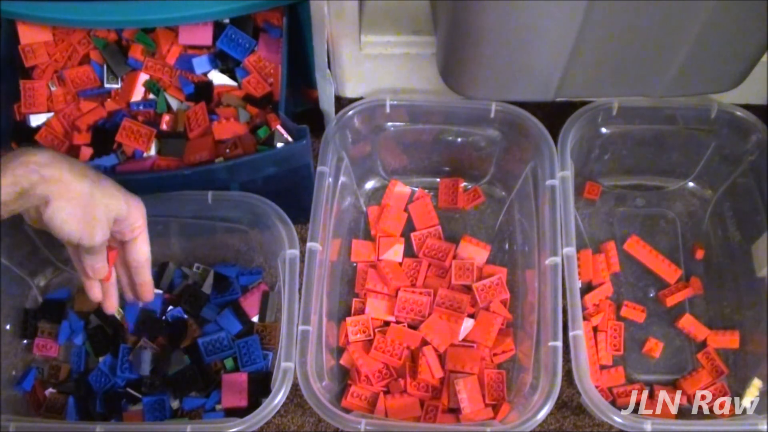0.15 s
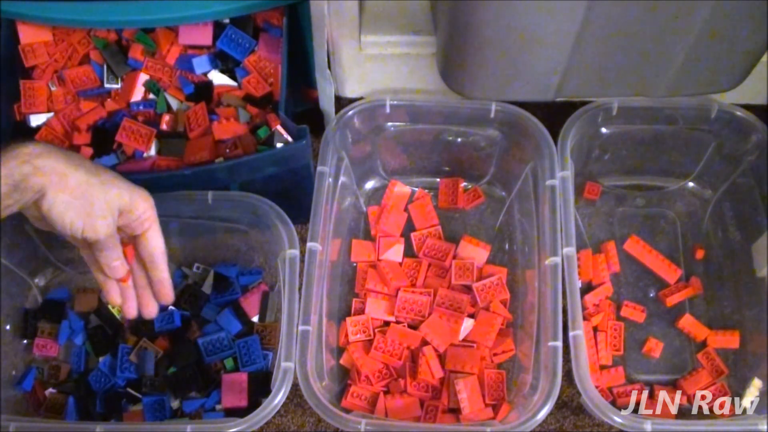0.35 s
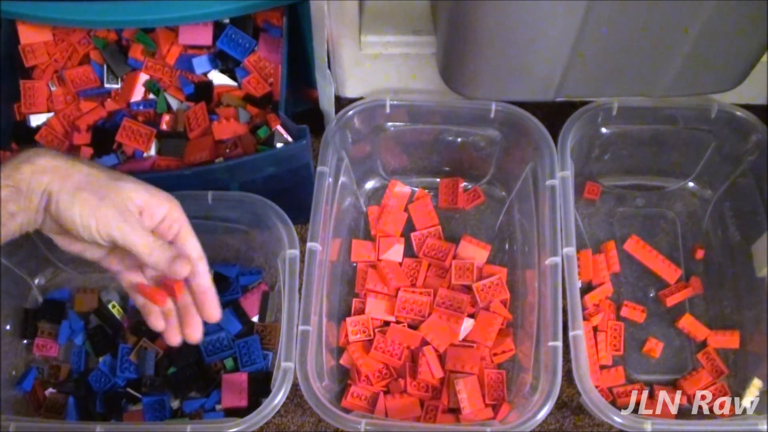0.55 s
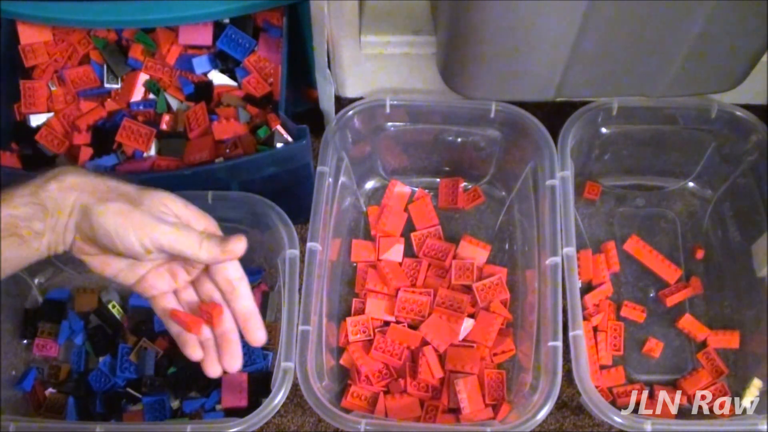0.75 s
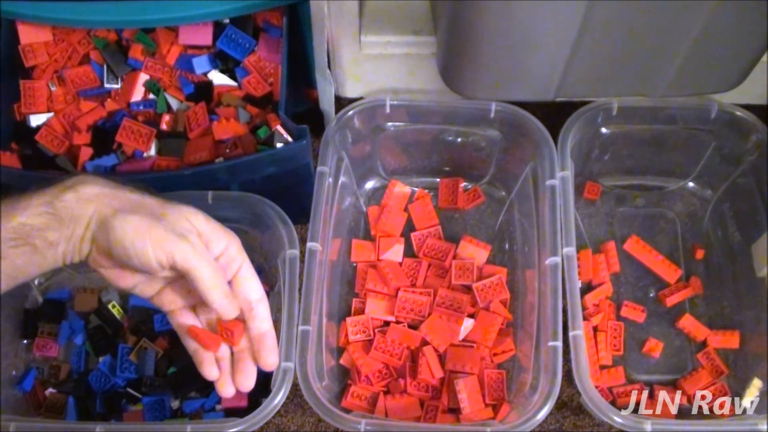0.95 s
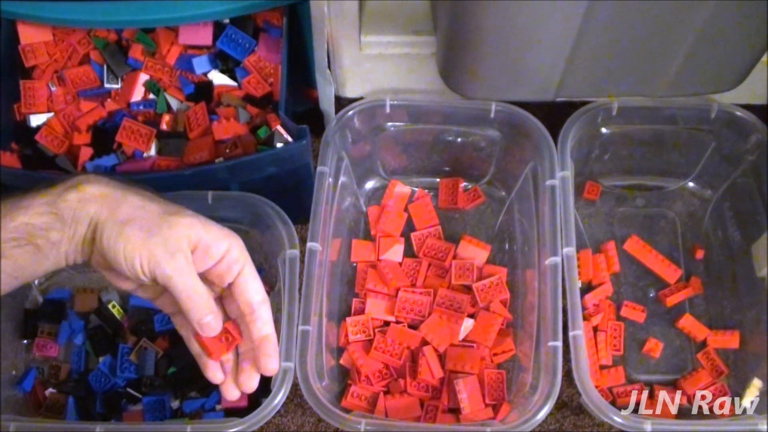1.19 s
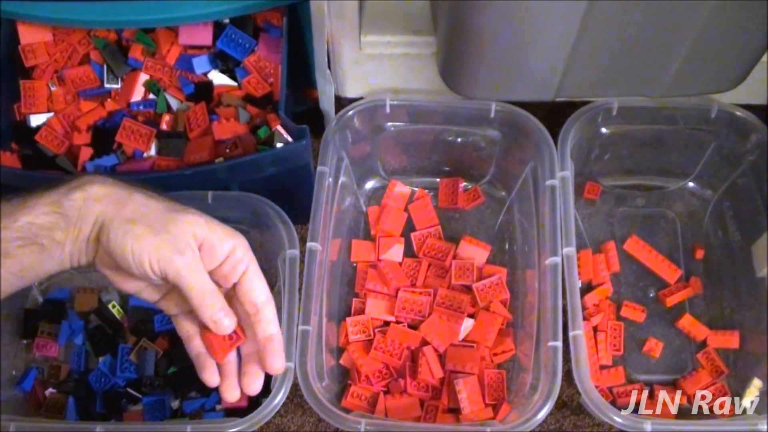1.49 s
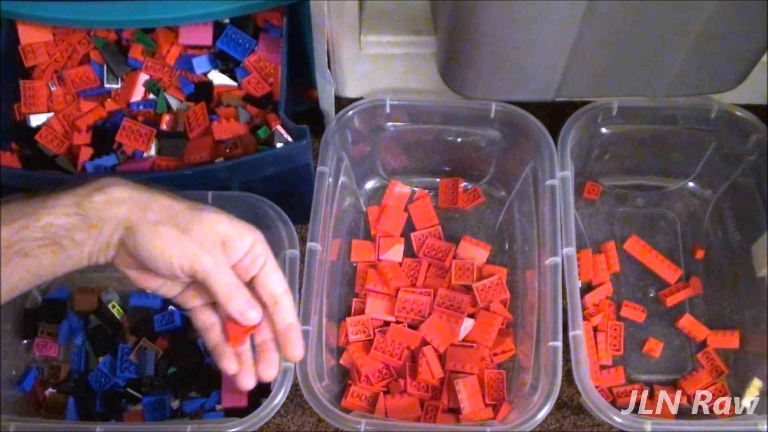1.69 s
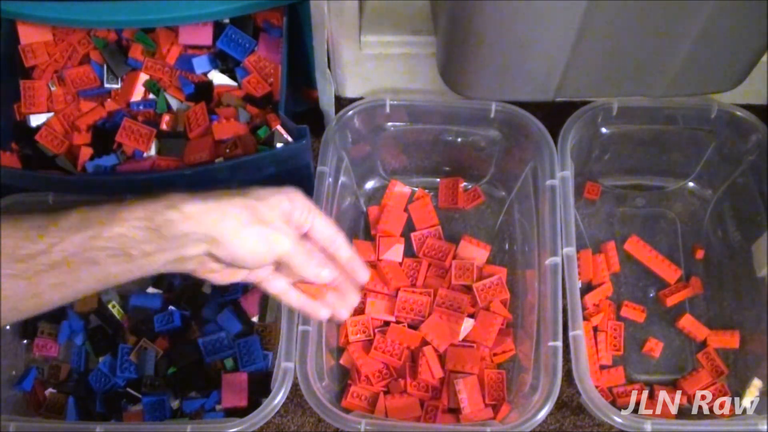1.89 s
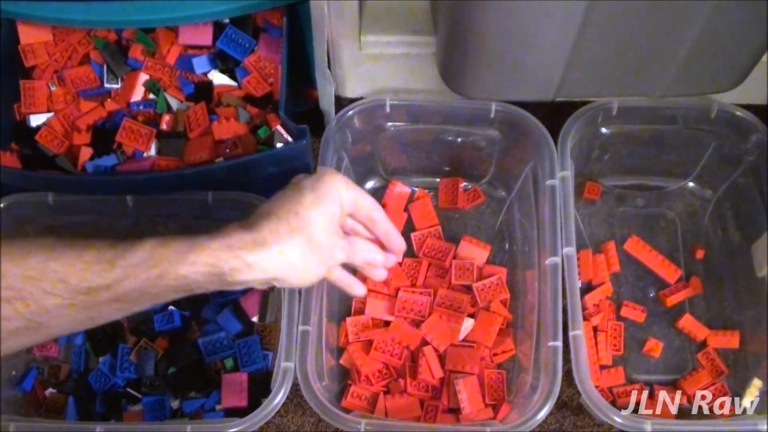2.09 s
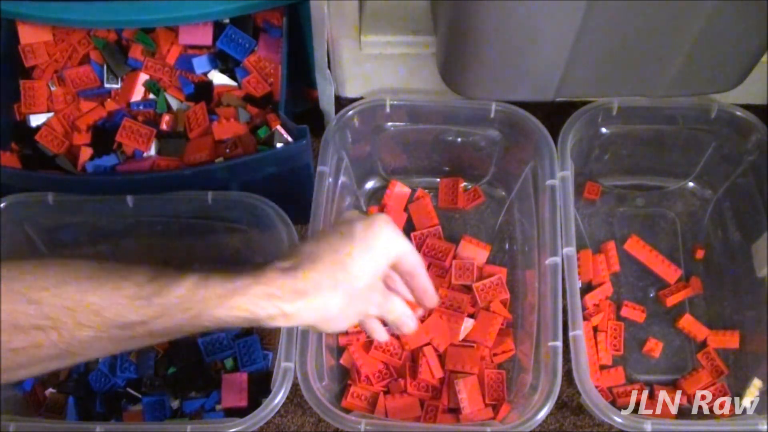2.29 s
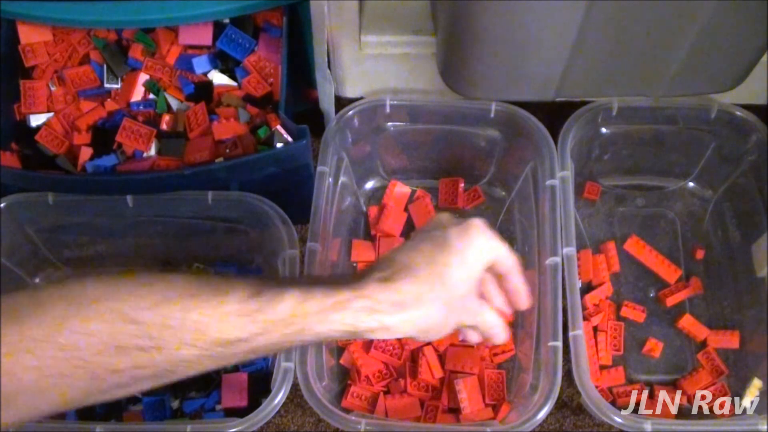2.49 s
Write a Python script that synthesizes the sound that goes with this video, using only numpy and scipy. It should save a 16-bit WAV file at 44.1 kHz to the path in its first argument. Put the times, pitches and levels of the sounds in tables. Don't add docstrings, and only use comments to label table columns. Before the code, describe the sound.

Plastic toy bricks rattle sharply into bins twice, clicking lightly in the hand over faint room hum.

```python
import sys
import numpy as np
from scipy import signal
from scipy.fft import rfft, irfft, next_fast_len
from scipy.io import wavfile
from scipy.ndimage import uniform_filter1d

SR = 44100
rng = np.random.default_rng(int(sys.argv[2]) if len(sys.argv) > 2 else 0)


def ratio_of_db(decibels):
    return 10 ** (np.asarray(decibels, float) / 20)


def int16_out(signal):
    q = np.round(np.clip(np.atleast_2d(signal).T, -1, 1) * 32767)
    wavfile.write(sys.argv[1], SR, q.astype(np.int16))


N = 116865

BRICK_LOW_HZ, BRICK_HIGH_HZ = 235, 16300


def rms_one(x):
    return x / np.sqrt(np.mean(x ** 2) + 1e-20)


def at_hz(points, hz):
    points = np.array(points)
    return np.interp(np.log(np.maximum(hz, 1)), np.log(points[:, 0]), points[:, 1])


def coloured(spectrum):
    weight = ratio_of_db(at_hz(spectrum, np.fft.rfftfreq(N, 1 / SR)))
    return irfft(rfft(rng.standard_normal(N)) * weight, N)


def band(x, low_hz, high_hz, order):
    edges = [low_hz, min(high_hz, .45 * SR)]
    return signal.sosfilt(signal.butter(order, edges, "band", fs=SR, output="sos"), x)


def train(s, gains):
    return np.bincount(np.clip((s * SR).astype(int), 0, N - 1), gains, N)


# f/Hz, density level/dB [dB per Hz]
HISS = [(12, -59.5), (20, -32), (130, -8.5), (248, -16.5), (270, -16.5), (301, -16.5), (2020, -22.5),
        (8410, -28), (16000, -30.5)]
# f/Hz, correlation [0-1]
LIKENESS = [(60, 0.94), (170, .98), (380, 0.18), (950, 0), (2400, 0.24), (6000, 0.75), (12000, 0.98)]
HISS_DB = -51


def hiss():
    hz = np.fft.rfftfreq(N, 1 / SR)
    alike = np.clip(at_hz(LIKENESS, hz), 0, 1)
    mid, side = rfft(rng.standard_normal((2, N))) * ratio_of_db(at_hz(HISS, hz))
    both = irfft(np.sqrt(1 + alike) * mid + np.sqrt(1 - alike) * side * [[1], [-1]], N)
    return ratio_of_db(HISS_DB + 2.5) * rms_one(both)


# f/Hz, width/Hz, level/dB
HUM = [(63, 28, -66.5), (108.2, 20, -63), (154.7, 33, -59), (242.7, 7.6, -61)]


def hum():
    hz = np.fft.rfftfreq(N, 1 / SR)
    total = np.zeros(N)
    for f, width_hz, db in HUM:
        line_shape = 1 / (1 + (2 * (hz - f) / width_hz) ** 2)
        total += ratio_of_db(db) * rms_one(irfft(rfft(rng.standard_normal(N)) * line_shape, N))
    return total


MAINS_HZ, MAINS_DB = 123, -54.5
WHINE_HZ, WHINE_DB = 8393, -66


def mains():
    t = np.arange(N) / SR
    return sum(ratio_of_db(db) * np.sqrt(2) * np.sin(2 * np.pi * hz * t)
               for hz, db in ((MAINS_HZ, MAINS_DB), (WHINE_HZ, WHINE_DB)))


def ring(clicks, hz, t60):
    r = ratio_of_db(-60 / (t60 * SR))
    w = 2 * np.pi * hz / SR
    return signal.lfilter([0, np.sin(w)], [1, -2 * r * np.cos(w), r * r], clicks + 1e-18)


STRIKE_SPREAD_DB, DETUNE = 3, 0.023


def strike(modes, s, db):
    draw = rng.standard_normal((len(s), len(modes), 3))
    total = np.zeros(N)
    for k, (hz, level_db, t60) in enumerate(modes):
        spread, sign, which = draw[:, k].T
        gains = ratio_of_db(db + level_db + STRIKE_SPREAD_DB * spread) * np.sign(sign)
        for side in (-1, 1):
            clicks = train(s, gains * (np.sign(which) == side))
            total += ring(clicks, hz * (1 + side * DETUNE / 2), t60)
    return total


# f/Hz, level/dB, t60/s
BIN = [(309, -9.5, 0.03), (425.3, -5, 0.059), (528, -6, 0.042), (862, -1, 0.025), (1125, -1, 0.027),
       (1437, -1, 0.041), (1764, -2, 0.012), (2214, 1, 0.022), (2688, -1.5, 0.022)]


def bin_walls(s, db):
    return strike(BIN, s, db)


# f/Hz, density level/dB [dB per Hz]
CRACK = [(120, -64.5), (200, -21), (380, -7), (671, -9.5), (1420, -9.5), (3490, -7), (6170, -1.5),
         (10100, -10), (16000, -21)]
CRACK_RISE_S, CRACK_T60_S = 0.00057, 0.013


def cracks(s, db, t60):
    power = signal.lfilter([1], [1, -ratio_of_db(-120 / (t60 * SR))], train(s, ratio_of_db(2 * db)) + 1e-18)
    rise = np.exp(-1 / (CRACK_RISE_S * SR))
    return rms_one(coloured(CRACK)) * np.sqrt(signal.lfilter([1 - rise], [1, -rise], power))


RING_HOLD_S, RING_SPLIT = 0.0021, 0.035


def own_rings(s, db, hz, t60):
    length = 8820
    out, t = np.zeros(N + length), np.arange(length) / SR
    for start, gain, f, life, share in zip((s * SR).astype(int), ratio_of_db(db), hz, t60, rng.random(len(s))):
        fade = ratio_of_db(-60 * np.maximum(t - RING_HOLD_S, 0) / life)
        pair = np.sin(2 * np.pi * f * t) + share * np.sin(2 * np.pi * f * (1 + RING_SPLIT) * t)
        out[start:start + length] += gain * fade * pair
    return out[:N]


# t/s, level/dB
RATTLE = [
    [(.241, -19), (.28, -28), (.298, -22.5), (.325, -22), (.39, -25.5), (.435, -34), (.47, -50), (.54, -57)],
    [(2.196, -55), (2.215, -23.5), (2.272, -31.5), (2.33, -34), (2.37, -35), (2.43, -48.5), (2.54, -57)],
    [(0, -48.5), (.04, -54), (.11, -54.5)],
]
RATTLE_SIZE_DB, RATTLE_CYCLES = 2, 110
RATTLE_CELLS_DB, RATTLE_WALL_DB, RATTLE_CRACK_DB, RATTLE_BRICK_DB = -2, -8.5, -0.5, -5


def rattle(phase, brick, count=400):
    t, level_db = np.transpose(RATTLE[phase])
    span = t[-1] - t[0]
    s = t[0] + span * rng.random(count)
    db = RATTLE_SIZE_DB * np.minimum(rng.exponential(1, count), 4)
    dealt = rng.integers(0, 13, count)
    cells = np.zeros(N)
    for k, hz in enumerate(np.geomspace(1500, 14000, 40)):
        clicks = train(s, ratio_of_db(db + at_hz(CRACK, hz)) * (dealt == k % 13))
        cells += ring(clicks, hz, RATTLE_CYCLES / hz)
    mix = ratio_of_db(RATTLE_BRICK_DB) * rms_one(strike(brick, s, db))
    mix += ratio_of_db(RATTLE_CELLS_DB) * rms_one(cells)
    mix += ratio_of_db(RATTLE_WALL_DB) * rms_one(bin_walls(s, db))
    mix += ratio_of_db(RATTLE_CRACK_DB) * rms_one(cracks(s, db, CRACK_T60_S))
    share = np.sqrt(span * SR / N)
    envelope = ratio_of_db(np.interp(np.arange(N) / SR, t, level_db))
    return share * band(mix, BRICK_LOW_HZ, 10500, order=2) * envelope


# f/Hz, level/dB, t60/s
BRICK_ONE = [(2180, -4.5, 0.016), (2980, -9.5, 0.051), (4400, -5, 0.075), (5500, -6, 0.098),
             (6370, -2, 0.034), (6850, -4, 0.059), (7700, 3, 0.015), (9080, -0.5, 0.025),
             (10180, -1.5, 0.029), (11700, -8, 0.023), (15000, -22, .015)]


def palm_rattle():
    return rattle(2, BRICK_ONE, count=60)


# t/s, snap level/dB, ring f/Hz, ring share level/dB
TICKS = [(.0012, -47.5, 5500, 10), (0.0221, -22, 8000, -15), (.0281, -42.5, 5360, 4),
         (.0526, -21.5, 10270, -12.5), (.0527, -33.5, 4330, -3), (0.5603, -25.5, 5350, -44),
         (.6067, -40, 5510, 2), (1.1225, -28, 5500, -11), (1.1584, -47.5, 5590, 6.5),
         (1.3275, -34.5, 4500, -14), (1.492, -31.5, 5570, 5), (1.601, -31.5, 5500, -10),
         (1.7447, -27.5, 5060, -27), (1.7751, -30, 4700, -15), (1.785, -34, 5600, -14),
         (1.88, -35, 4560, -17), (1.8461, -30.5, 5930, -21), (1.9811, -22.5, 5730, -31),
         (2.5576, -39, 7400, -7), (2.5606, -14, 6640, -34), (2.6271, -35, 3760, -18)]
TICK_T60_S, TICK_CRACK_DB, TICK_CRACK_T60_S = 0.019, -17.5, 0.026
HARD_FROM_DB, HARD_LOW_HZ = -20, 1100
SNAP_LOW_HZ, SNAP_HIGH_HZ = 2760, 7240


def ticks():
    s, db, hz, ring_db = np.transpose(TICKS)
    hard = db > HARD_FROM_DB
    snap = np.zeros(N)
    for full, low_hz in ((True, HARD_LOW_HZ), (False, SNAP_LOW_HZ)):
        clicks = -train(s, ratio_of_db(db) * (hard == full)) + 1e-18
        snap += 3 * band(clicks, low_hz, SNAP_HIGH_HZ, order=2)
    crack = band(cracks(s, db + TICK_CRACK_DB, TICK_CRACK_T60_S), SNAP_LOW_HZ, BRICK_HIGH_HZ, order=1)
    rings = own_rings(s, db + ring_db, hz, np.full(len(s), TICK_T60_S))
    return snap + rings + crack + palm_rattle()


RING_DB, CELLS_DB, WALL_DB, CRACK_DB = -9.5, -19, -12, -12
CHATTER_S, CHATTER_LOSS_DB = .002, 4
CRACK_TREBLE_HZ, TREBLE_DB = 10000, 3
SOFT_DULLING = 0.42


def knocks(rows, brick, count=3):
    first_s, first_db, hz, _, t60 = np.transpose(rows)
    s, db, _, wall_db, _ = np.repeat(np.array(rows), count, axis=0).T
    turn = np.arange(len(s)) % count
    s = s + CHATTER_S * (turn > 0) * rng.random(len(s))
    db = db - CHATTER_LOSS_DB * turn
    body = cracks(s, db + CRACK_DB, CRACK_T60_S)
    treble = cracks(s, (1 + SOFT_DULLING) * db + CRACK_DB + TREBLE_DB, CRACK_T60_S)
    crack = band(body, BRICK_LOW_HZ, CRACK_TREBLE_HZ, order=2)
    crack += band(treble, CRACK_TREBLE_HZ, BRICK_HIGH_HZ, order=2)
    rings = own_rings(first_s, first_db + RING_DB, hz, t60)
    cells = strike(brick, s, db + CELLS_DB)
    return rings + cells + bin_walls(s, db + wall_db + WALL_DB) + crack


# t/s, peak level/dB, brick ring f/Hz, bin wall share level/dB, ring t60/s
DROP_ONE = [(.2414, -0.5, 6850, -11, 0.015), (.2422, -5, 8900, -25, 0.029), (.2476, -6.5, 6700, -7, .015),
            (.2539, 0, 5450, -6.5, 0.012), (.2588, -6.5, 5750, -6, .012), (.2654, -3.5, 5750, -35, 0.027),
            (.2690, -3, 7150, -30, .015), (.2745, -2.5, 5700, -21, .03), (.2800, -21, 6300, -28, .015),
            (.2851, -10, 6130, -30, .015), (.3016, -5, 6850, -12, 0.012), (.3036, -7, 5850, -9, .008),
            (.3068, -7.5, 6800, -5, 0.012), (.3100, -10, 6700, -11, 0.037), (.3199, -3, 6160, -4, 0.015),
            (.3235, -5, 6330, -21, .03), (.3285, -4, 6200, -18, .02), (.341, -10.5, 6330, -8, 0.017),
            (.349, -11, 6240, -13, .025), (.3545, -9, 5450, -9, 0.018), (.359, -9.5, 7150, -3, 0.019),
            (.3650, -18, 6260, -20, .015), (.3691, -7, 5500, -7, 0.035), (.3770, -10.5, 5650, -2.5, .012),
            (.3809, -2, 6850, -16, 0.009), (.3822, -6.5, 4400, -19, .04), (.3875, -9.5, 6000, -26, 0.018),
            (.393, -13, 5430, -14, 0.014), (.3965, -18.5, 5500, 1, .02), (.4090, -26, 5570, -15, .03),
            (.4146, -16, 5370, -9.5, .03), (.4220, -21, 6900, -2, 0.017), (.429, -33, 5330, -15, 0.027),
            (.4410, -33, 4400, 0, .1), (.4470, -35, 6300, -3, .03), (.4610, -38, 6200, -3, 0.043),
            (.4910, -38, 4400, -20, 0.11)]


def first_handful():
    return knocks(DROP_ONE, BRICK_ONE) + rattle(0, BRICK_ONE)


# t/s, peak level/dB, brick ring f/Hz, bin wall share level/dB, ring t60/s
DROP_TWO = [(2.1886, -1.5, 7050, -18, .02), (2.1915, -7.5, 7200, -10.5, .014), (2.1978, 0, 6980, -34, 0.03),
            (2.1985, -5.5, 4680, -19, 0.017), (2.2038, 0, 7460, -25, 0.01),
            (2.2122, -6, 8150, -10.5, 0.015), (2.2150, -23, 7060, -25, .02), (2.2225, -16, 6550, -5, .02),
            (2.2305, -15.5, 7000, -5, .018), (2.238, -9, 6430, -5, .015), (2.2420, -18, 7340, -5, .015),
            (2.2545, -20.5, 3920, 5, .015), (2.263, -28, 4750, 2, .03), (2.2720, -26, 4700, 8, .015),
            (2.2795, -13, 4780, -1, 0.05), (2.2808, -12, 6960, -1.5, 0.0085),
            (2.2830, -15.5, 8900, -8, .015), (2.3005, -16, 7050, -11, .014),
            (2.3098, -3.5, 6930, -18, 0.01), (2.3104, -9.5, 6030, -12, .011),
            (2.3175, -5.5, 6010, -22, 0.032), (2.3180, -5.5, 8670, -39, 0.024),
            (2.331, -18.5, 6050, 2, 0.023), (2.3420, -23, 4100, 0.5, 0.017), (2.3526, -13, 7050, -23, 0.02),
            (2.3570, -22.5, 4760, -11, 0.013), (2.3796, -16.5, 8600, -8.5, 0.01),
            (2.391, -19, 6170, -13, 0.011), (2.402, -25.5, 8500, -8, 0.013), (2.411, -31, 8650, -7, .012),
            (2.4485, -19.5, 8850, -7.5, 0.0047), (2.4495, -24, 4230, -7, 0.019),
            (2.4769, -24, 8850, -10, 0.011), (2.4936, -33, 8970, -8, 0.028), (2.4945, -37, 6500, 0, .05),
            (2.505, -36.5, 8850, 1.5, .015), (2.519, -44, 2150, -5, 0.016), (2.616, -39, 3900, -15, .015),
            (2.6455, -40.5, 3520, 4, .02)]
# f/Hz, level/dB, t60/s
BRICK_TWO = [(1953, -10.5, 0.045), (2870, -6.5, 0.013), (4115, -13.5, 0.096), (4700, -1.5, 0.02),
             (6050, -6, 0.01), (6650, 1, 0.011), (7050, 2, 0.019), (7900, 2.5, 0.014), (8850, -5, 0.06),
             (10700, -17, 0.017), (12200, -6, 0.0042), (14800, -13, 0.008)]
FULL_BIN_LOW_HZ = 390


def second_handful():
    drop = knocks(DROP_TWO, BRICK_TWO) + rattle(1, BRICK_TWO)
    return band(drop, FULL_BIN_LOW_HZ, BRICK_HIGH_HZ, order=2)


def pan(x, pan_db):
    treble = band(x, 1800, BRICK_HIGH_HZ, order=1)
    return x + treble * (ratio_of_db(np.array([[pan_db / 2], [-pan_db / 2]])) - 1)


RIM_ECHO_S, RIM_ECHO_DB = 0.000968, -16


def rim_echo(x):
    late = np.interp(np.arange(N) - RIM_ECHO_S * SR, np.arange(N), x)
    return ratio_of_db(RIM_ECHO_DB) * band(late, 2080, 11000, order=2) * [[1], [-1]]


ROOM_T60_S, ROOM_DB, ROOM_WIDTH, WALL_CUT_HZ = 0.34, -20.5, 0.4, 7000


def room(x):
    size = next_fast_len(N + SR)
    w = 2 * np.pi * np.fft.rfftfreq(size)
    dull = 1 / (1 + 1j * w * SR / (2 * np.pi * WALL_CUT_HZ))
    lags = rng.uniform(.006, .03, (2, 8, 1)) * SR
    loop = ratio_of_db(-60 * lags / SR / ROOM_T60_S) * dull * np.exp(-1j * w * lags)
    wet = irfft(rfft(x, size) * (loop / (1 - loop)).sum(axis=1), size)[:, :N]
    middle = wet.mean(axis=0)
    return ratio_of_db(ROOM_DB) * (middle + ROOM_WIDTH * (wet - middle))


DUCK_FROM_DB, DUCK_RATIO, DUCK_RELEASE_DB_PER_S = -27.5, 0.44, 20.5


def ducking(x):
    ramp = DUCK_RELEASE_DB_PER_S * np.arange(N) / SR
    level_db = 10 * np.log10(uniform_filter1d(x ** 2, size=441) + 1e-12)
    over_db = np.maximum(level_db - DUCK_FROM_DB, 0)
    return ratio_of_db(-(np.maximum.accumulate(DUCK_RATIO * over_db + ramp) - ramp))


def scene():
    background = hiss() + hum() + mains()
    light = ticks()
    one = first_handful()
    two = second_handful()
    contacts = one + two + light
    bricks = pan(one, 1.9) + pan(two, .7) + pan(light, 1.5)
    bricks = bricks + room(contacts) + rim_echo(contacts)
    return band(bricks, BRICK_LOW_HZ, BRICK_HIGH_HZ, order=4) + ducking(contacts) * background


def band_limit(x):
    return signal.sosfilt(signal.butter(12, 17020, fs=SR, output="sos"), x)


def record(dry):
    clip_top = 1.05
    rounded = clip_top * np.tanh(dry / clip_top)
    top_cut = signal.cheby2(12, 50, 16150, fs=SR, output="sos")
    return band_limit(signal.sosfilt(top_cut, rounded))


dry = scene()
out = record(dry)
int16_out(out)
```